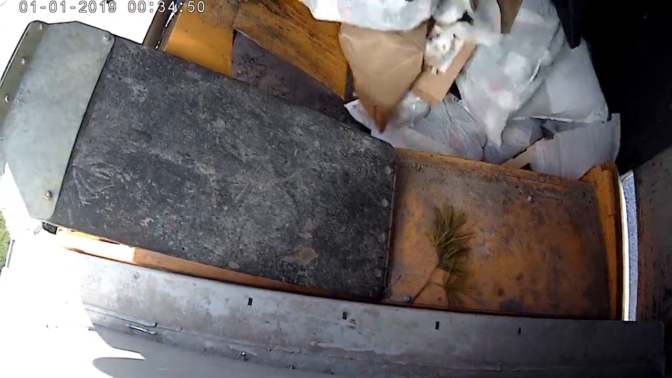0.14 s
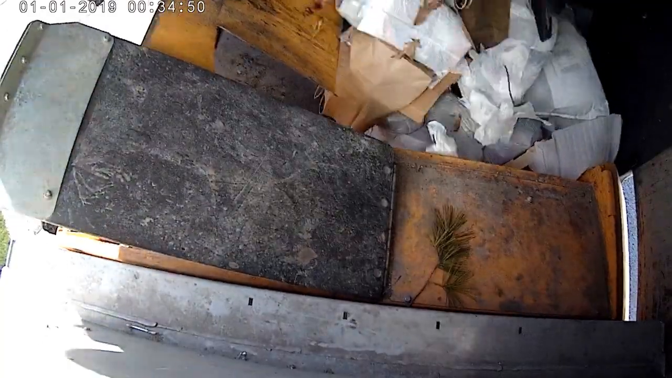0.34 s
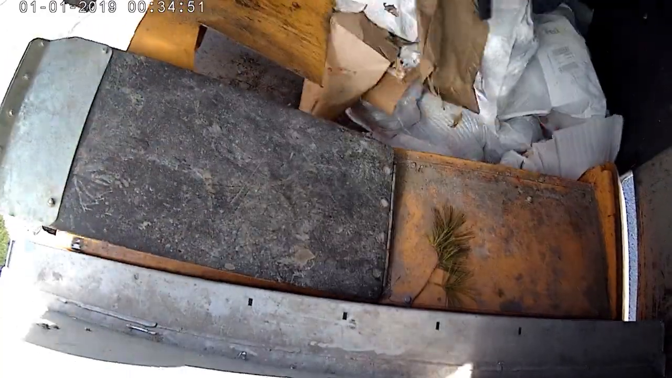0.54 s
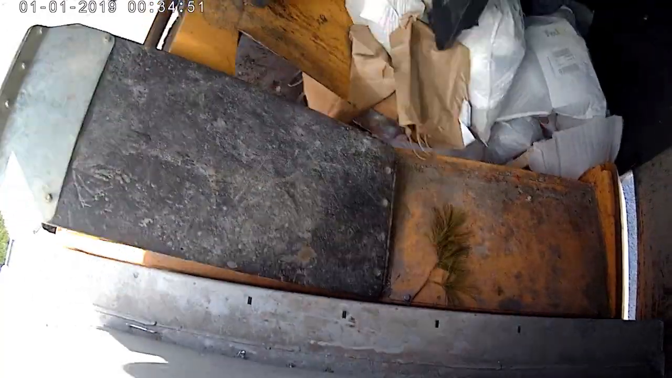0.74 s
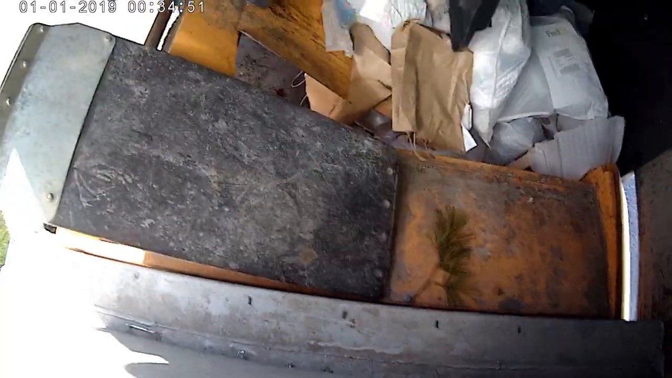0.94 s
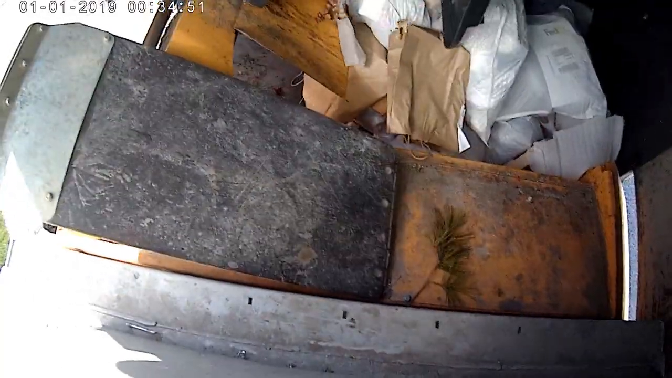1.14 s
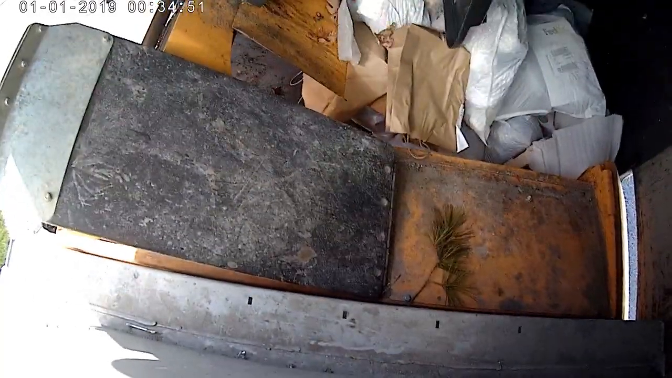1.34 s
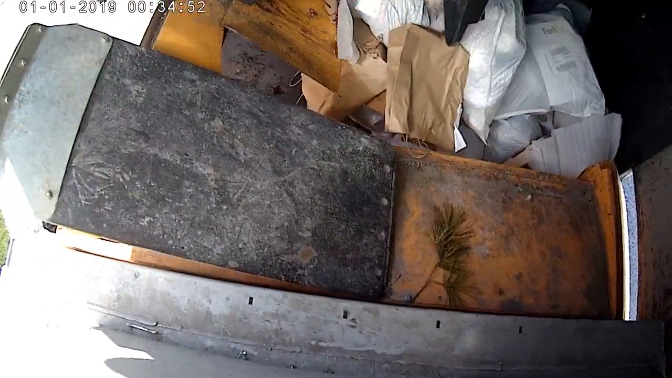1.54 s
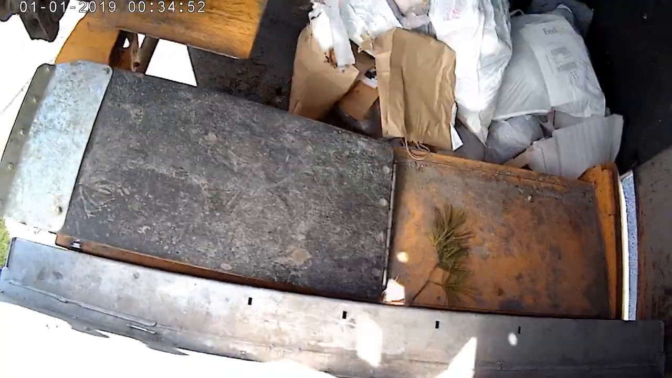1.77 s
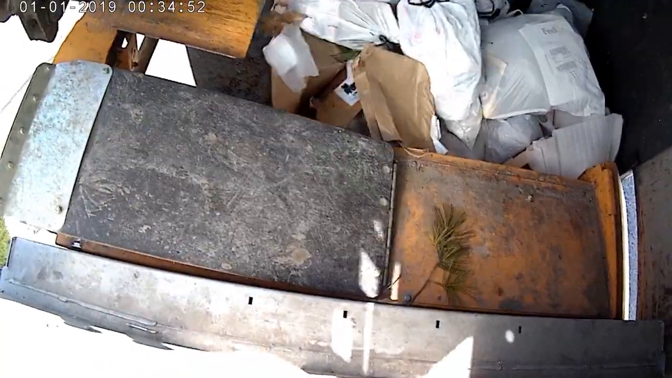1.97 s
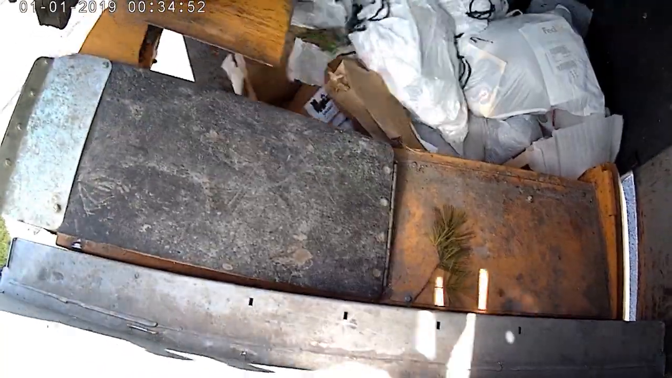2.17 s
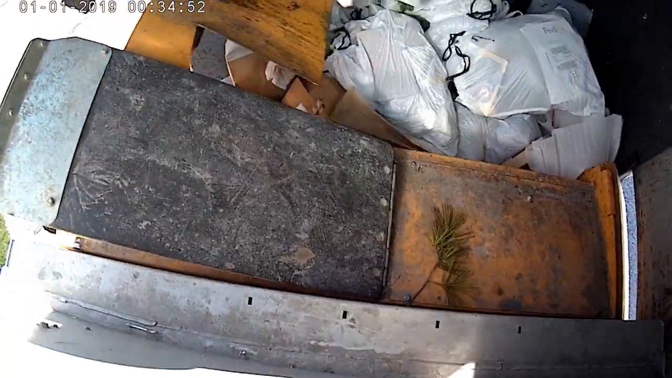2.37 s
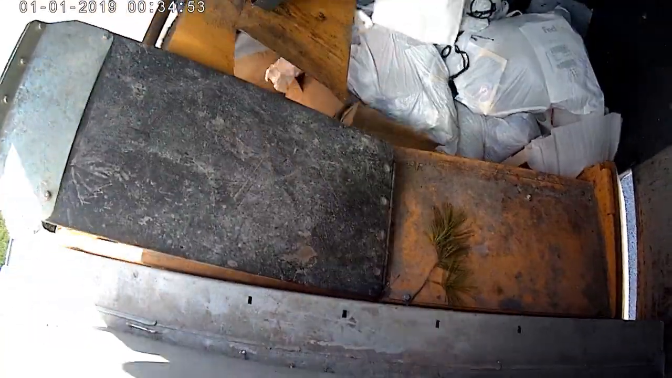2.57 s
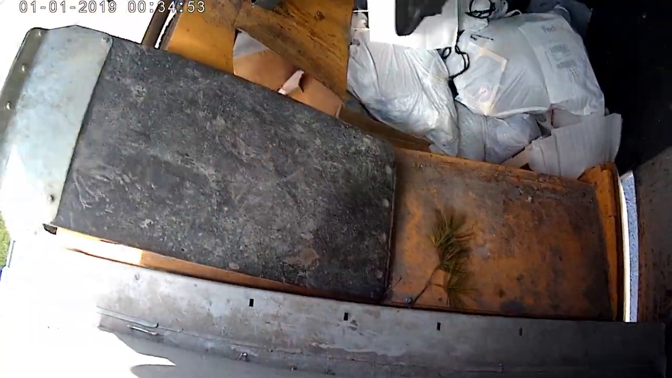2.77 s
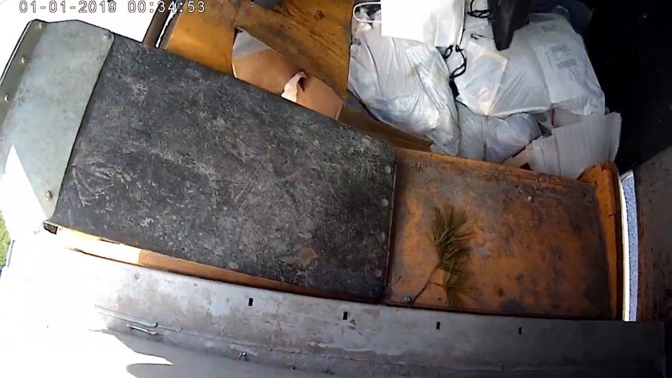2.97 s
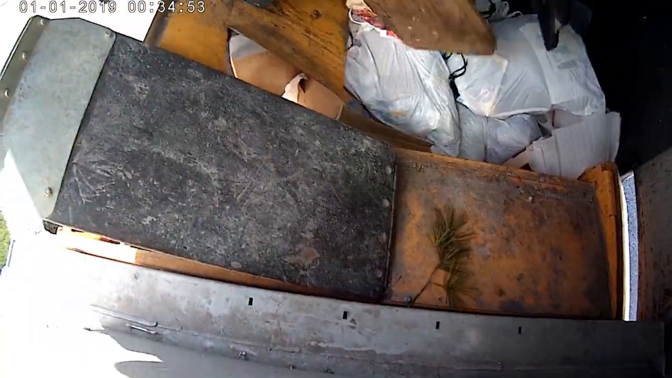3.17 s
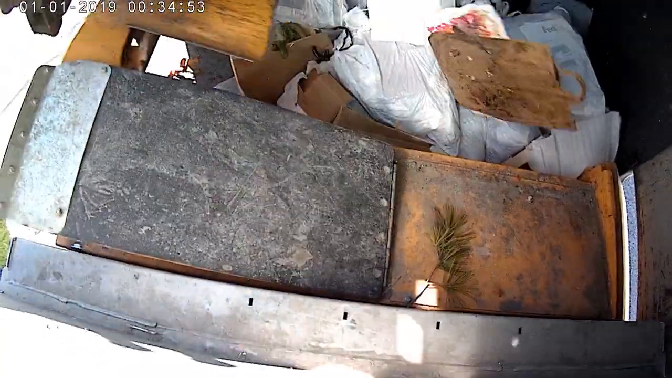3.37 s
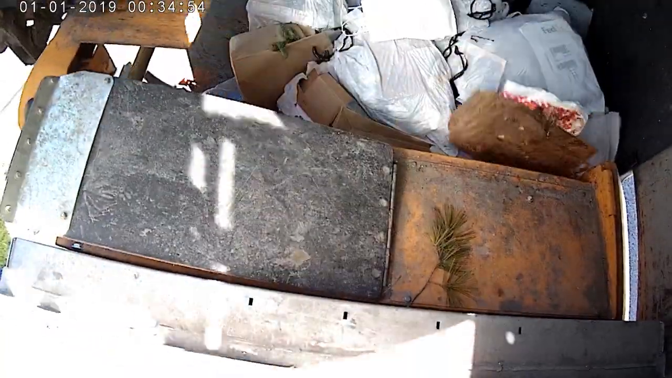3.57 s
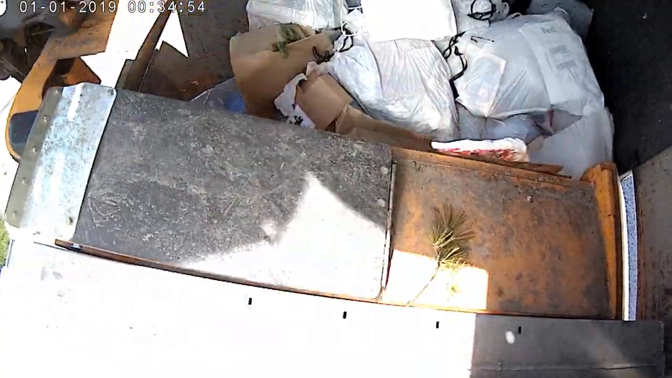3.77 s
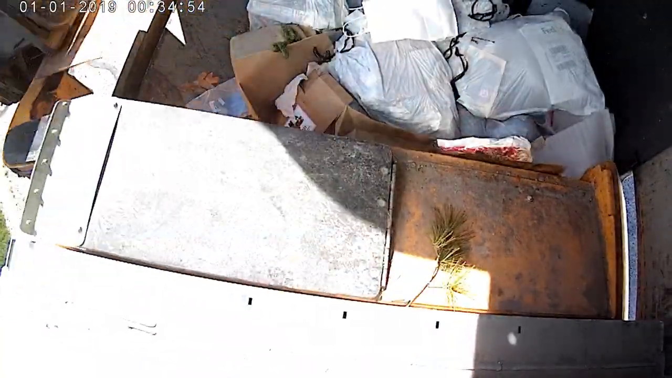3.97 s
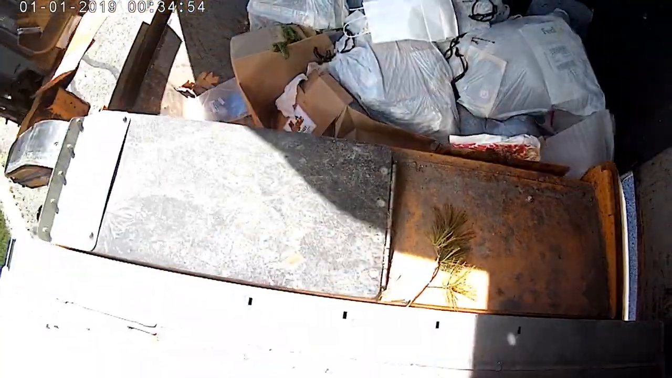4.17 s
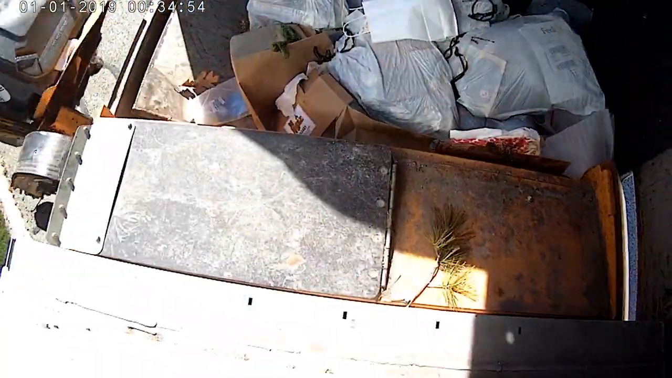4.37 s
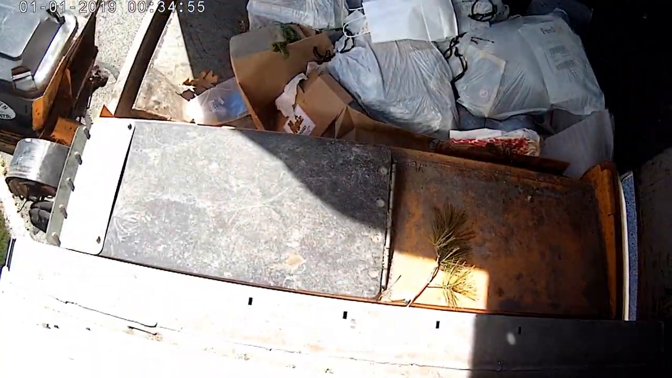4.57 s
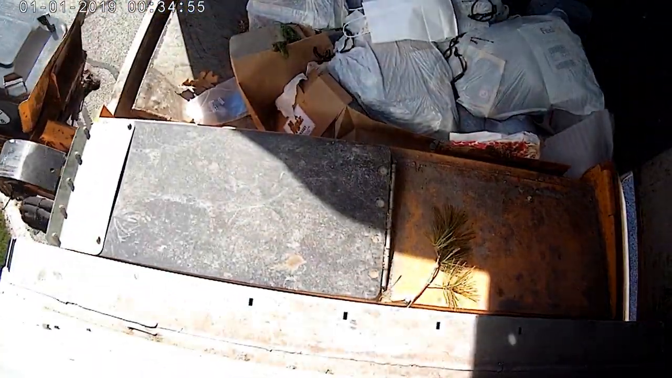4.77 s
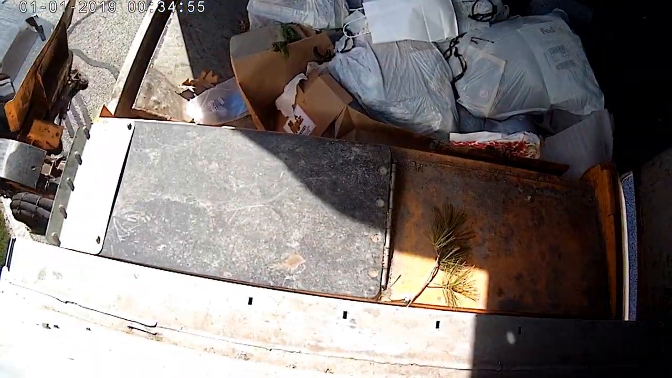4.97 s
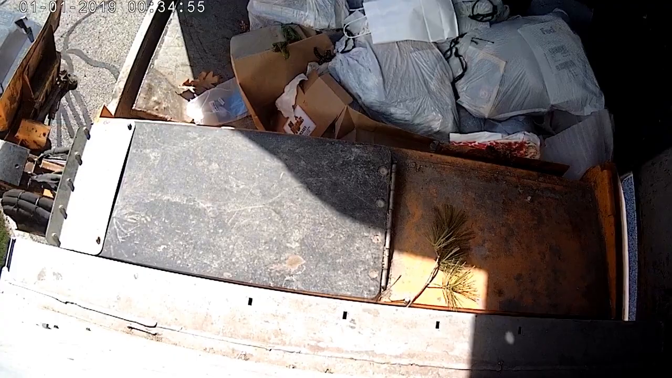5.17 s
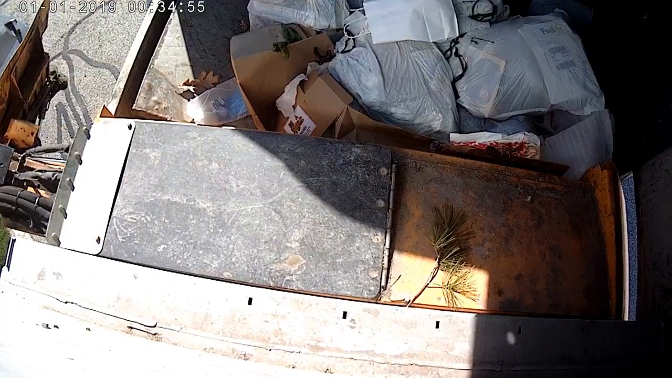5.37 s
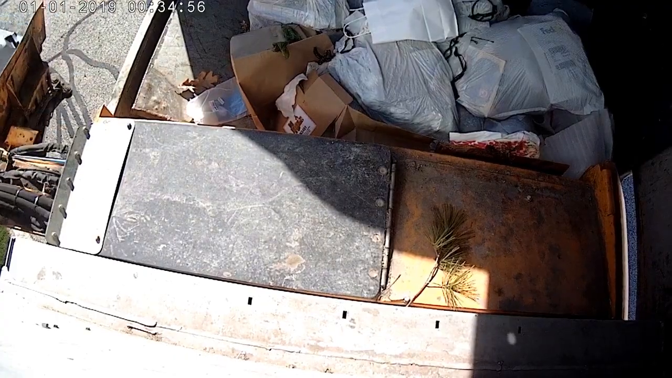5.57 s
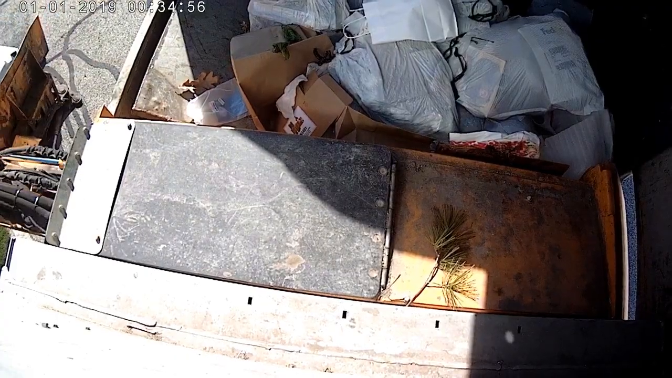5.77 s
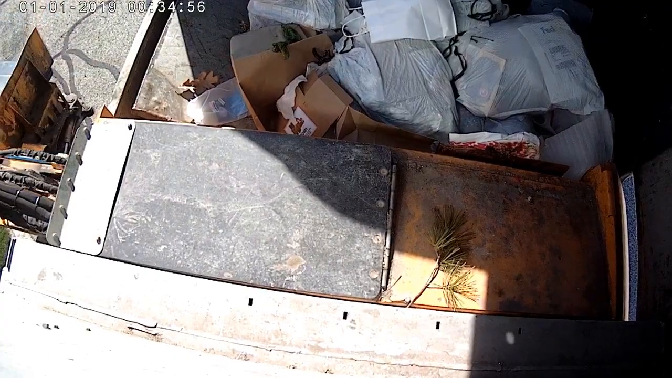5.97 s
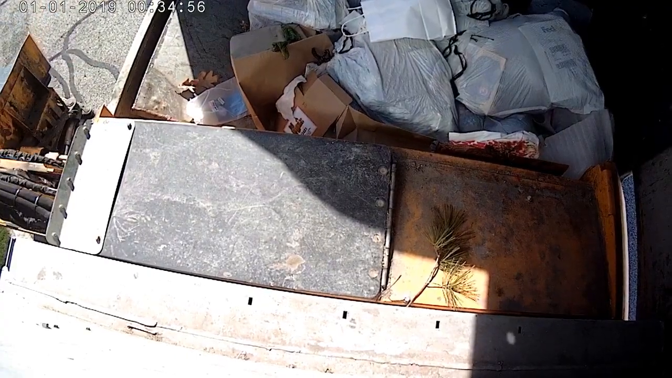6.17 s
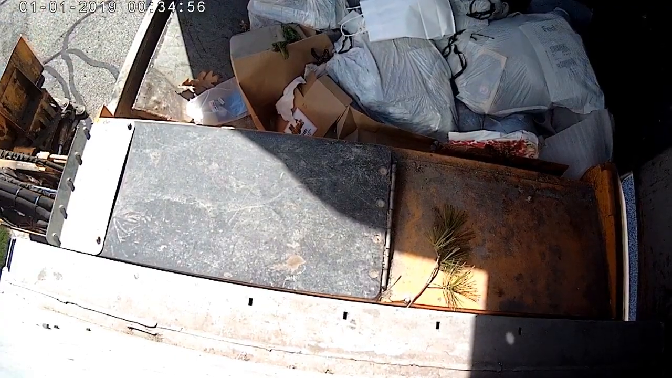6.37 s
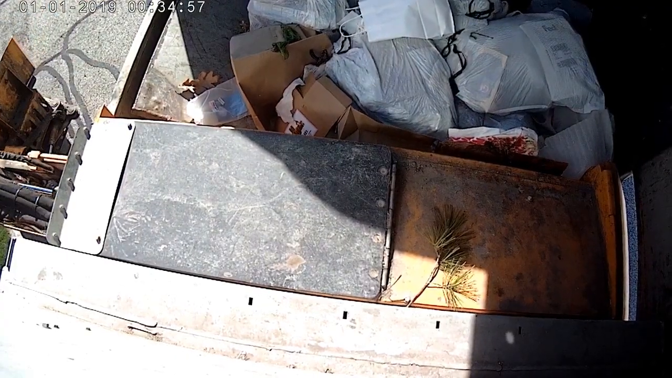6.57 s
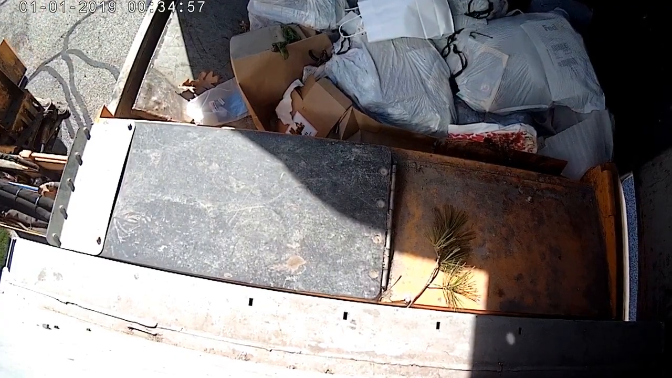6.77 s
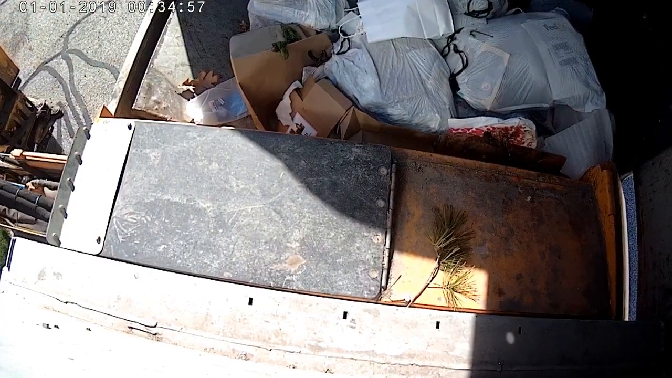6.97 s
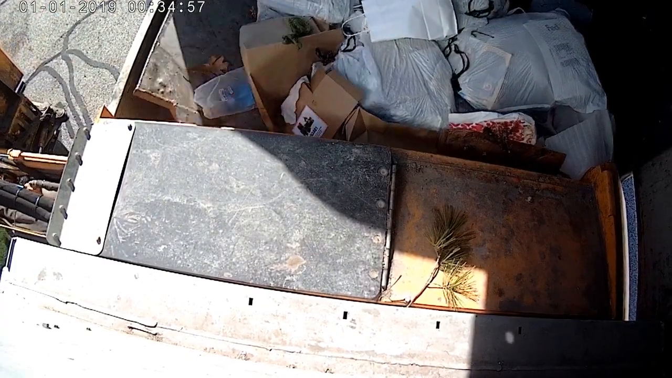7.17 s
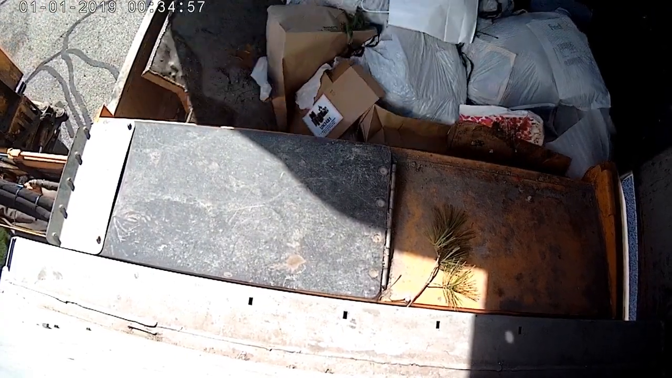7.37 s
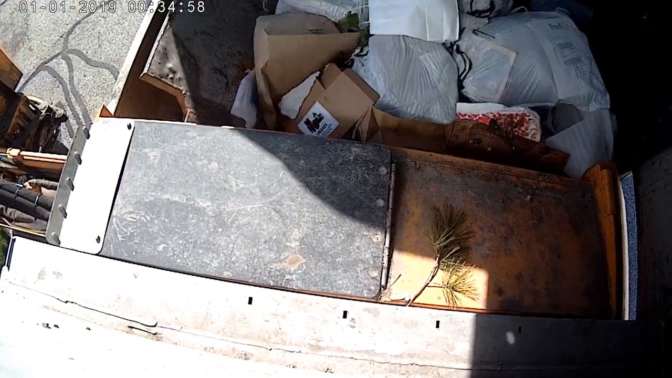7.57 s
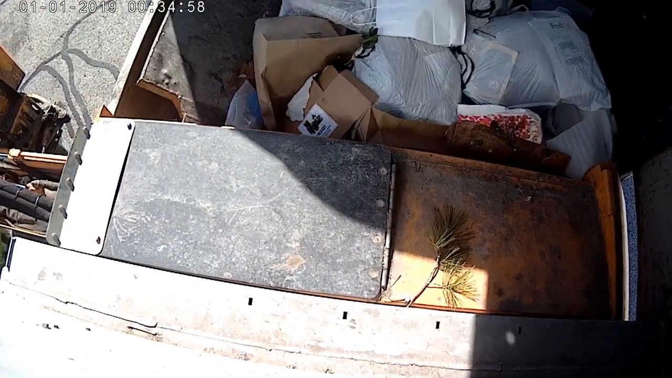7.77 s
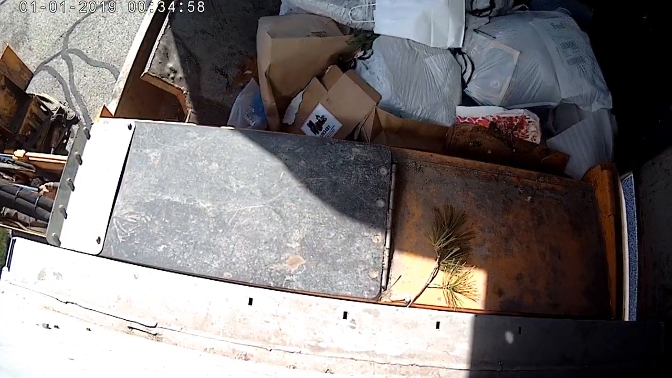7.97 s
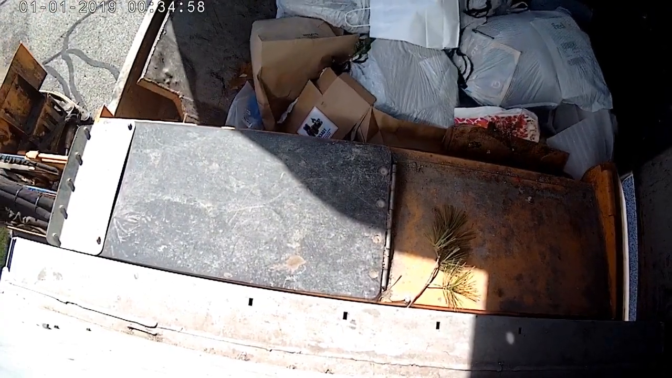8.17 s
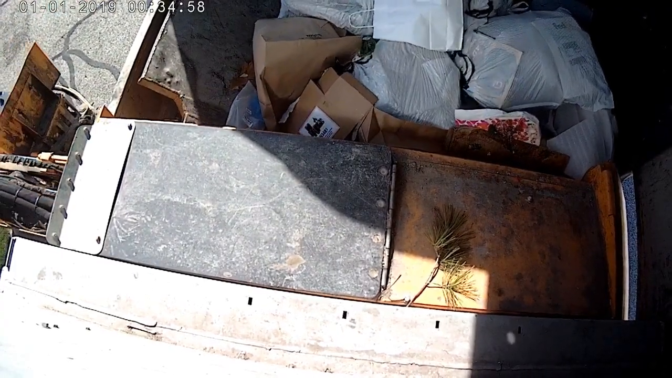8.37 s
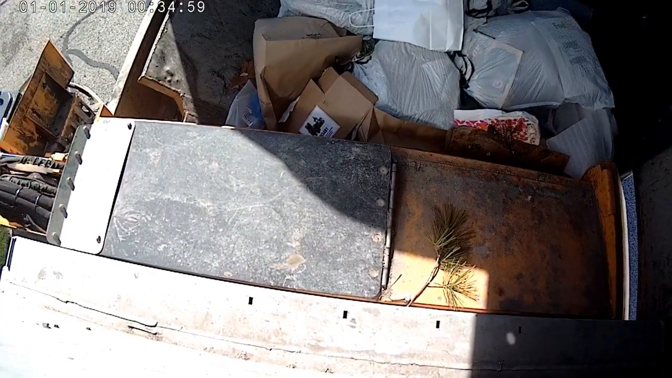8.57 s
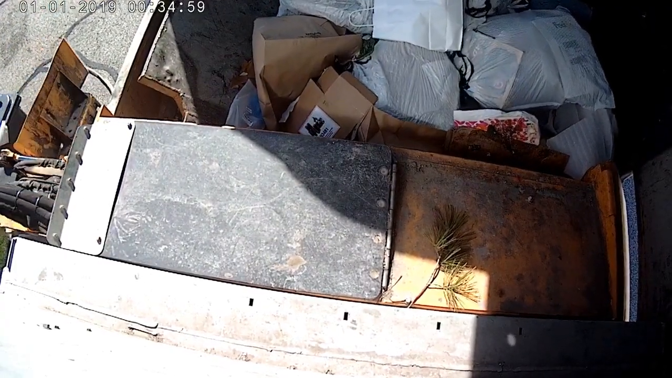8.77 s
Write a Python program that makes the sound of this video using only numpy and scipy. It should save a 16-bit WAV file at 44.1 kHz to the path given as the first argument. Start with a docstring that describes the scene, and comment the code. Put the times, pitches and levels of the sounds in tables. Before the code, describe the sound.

Overdriven metallic bangs, bag crunches and deep booms as a bin is shaken into a refuse truck, then mostly hydraulic whine and engine roar

```python
"""A bin is shaken out into the steel hopper of a refuse truck: blows and a hail of knocks ring steel modes.
Under it the body booms and thumps, as shaped noise and swelling sines, with short pushes of low pressure.
The hydraulic pump whines in steps as its valve moves, over the firing thud and roar of the idling engine.
A small camera fixed to the truck body hears it all far too loud: its narrow-band converter clips,
so booms and blows turn into square-edged buzz."""
import sys
import numpy as np
from scipy import signal
from scipy.fft import rfft, irfft
from scipy.io import wavfile
from scipy.ndimage import uniform_filter1d

SR = 44100
rng = np.random.default_rng(int(sys.argv[2]) if len(sys.argv) > 2 else 0)


def unload_audio(sound):
    """Save the sound as a 16-bit wav file, at the path given as the first command line argument."""
    columns = np.transpose(np.atleast_2d(sound))
    # keep every value between -1 and 1, then stretch to whole-number steps
    steps = np.round(np.clip(columns, -1, 1) * 32767)
    wavfile.write(sys.argv[1], SR, steps.astype(np.int16))


N = 389844


def gain_of(db):
    """Decibels to an amplitude factor."""
    return 10 ** (np.asarray(db) / 20)


def evened(x):
    """Scales to rms 1."""
    return x / np.sqrt(np.mean(x ** 2) + 1e-20)


def curves(rows):
    """Columns of a table as straight lines between its rows, one value a sample."""
    s, *columns = np.transpose(rows)
    return [np.interp(np.arange(N) / SR, s, c) for c in columns]


def held(rows, glide_s):
    """Columns of a table as steps, each gliding to the next."""
    s, *columns = np.transpose(rows)
    row = np.maximum(np.searchsorted(s, np.arange(N) / SR, "right") - 1, 0)
    return [uniform_filter1d(c[row], max(round(glide_s * SR), 1)) for c in columns]


def drift(top_hz):
    """Slow random wander of rms 1, fading out around top_hz."""
    spectrum = rfft(rng.standard_normal(N))
    lowpass = np.exp(-(np.fft.rfftfreq(N, 1 / SR) / top_hz) ** 2)
    return evened(irfft(spectrum * lowpass, N))


def noise(points):
    """Noise of rms 1 with the given spectrum, drawn over log frequency."""
    f, db = np.transpose(points)
    hz = np.fft.rfftfreq(N, 1 / SR)
    shape = np.interp(np.log(hz + 1), np.log(f + 1), db, left=-60, right=-90)
    return evened(irfft(rfft(rng.standard_normal(N)) * gain_of(shape), N))


def ring(x, hz, t60):
    """One mode: a click of height 1 leaves a sine of height 1 that is 60 dB down after t60 seconds."""
    pole = np.exp((2j * np.pi * hz - np.log(1000) / t60) / SR)
    return signal.lfilter([1], [1, -pole], x).imag


def add(mix, s, sound):
    """Lays a sound into the mix at a time in seconds."""
    part = mix[round(s * SR):][:len(sound)]
    part += sound[:len(part)]


# Modes of the steel hopper. Each row: pitch in Hz, relative level in dB, time to fall 60 dB after a blow in s.
HOPPER = [(217.2, 1, 0.15), (303.4, 0.5, 0.076), (409.7, 2, 0.091), (525, -3, 0.05), (626, -3.5, 0.071),
          (680, -5, 0.15), (754, -3, 0.067), (856, -1.5, 0.062), (1030, -2.5, 0.05), (1228, -9, 0.069),
          (1510, -9, 0.016), (2120, -16, 0.032), (2400, -22, 0.056)]
# Single blows on the steel. Each row: start in seconds, strength in dB, note of the struck panel in Hz,
# length of the chatter after it in seconds (at least 5 ms is used).
BLOWS = [(.103, -12, 622, 0.15), (0.176, -5, 530, 0.073), (.267, -11, 750, 0.046), (.337, -8, 813, 0.0066),
         (.41, 1.5, 213, 0.021), (.458, 2, 625, 0.023), (.49, -0.5, 696, 0.03), (.56, -3.5, 666, 0.029),
         (.672, -15, 706, 0.0099), (0.709, -3, 494, 0.042), (.744, 4.5, 562, 0.031),
         (.835, -13.5, 556, 0.033), (0.941, -10, 578, 0.017), (0.989, -9.5, 910, 0.025),
         (1.019, -17, 700, 0.016), (1.084, -17.5, 686, 0.013), (1.145, -14, 662, 0.065),
         (1.262, -18, 692, 0.098), (1.589, -14.5, 412, 0.021), (1.695, -16.5, 680, 0.12),
         (1.878, -27, 870, 0.18), (1.955, -8, 577, 0.073), (2.003, -18, 496, 0.011),
         (2.058, -8, 900, 0.083), (2.173, -10, 761, 0.091), (2.295, -7, 605, 0.048),
         (2.408, -13, 688, 0.037), (2.689, -15, 680, 0.07), (2.788, -13, 550, 0.076),
         (2.928, -3, 1010, 0.074), (2.981, 4.5, 525, 0.072), (3.078, -12, 830, 0.097),
         (3.214, -21.5, 2440, 0.033), (3.259, -12, 1012, 0.01), (3.356, -6.5, 730, 0.029),
         (3.404, -2, 638, 0.018), (3.444, -1.5, 618.5, 0.049), (3.557, -5, 575, 0.052),
         (4.019, -9, 654, 0.066), (4.236, 0, 610, 0.062), (4.289, -3, 614, 0.12), (4.45, -16, 705, 0.042),
         (4.558, -12.5, 691, 0.014), (5.134, -20.5, 893, 0.11), (5.586, -31, 2200, 0.03),
         (5.603, -21, 1250, 0.0076), (5.657, -24.5, 1266, 0.0064), (5.72, -24, 933, 0.11),
         (7.461, -10, 706, 0.06), (7.511, -14, 802, 0.03), (7.538, -17, 910, 0.033),
         (7.851, -18, 1030, 0.049)]
PANEL_CYCLES = 32  # cycles the struck panel rings before it is 60 dB down
NEIGHBOURS_DB = 2.5  # the rest of the hopper against the struck panel


def blows():
    """Each blow is a strike and its chatter, ringing one panel and the hopper modes near its note."""
    out = np.zeros(N)
    t = np.arange(SR // 3) / SR
    for s, blow_db, spot_hz, length in BLOWS:
        # a first strike, then about 1500 weaker knocks a second that hold for a while and stop
        chatter = rng.standard_normal(len(t)) * (rng.random(len(t)) < 1500 / SR) * 0.18
        chatter[0] = 1
        chatter *= np.exp(-(t / max(length, .005)) ** 3)
        near = np.zeros(len(t))
        for hz, db, t60 in HOPPER:
            octaves_away = abs(np.log2(hz / spot_hz))
            near += gain_of(db - 20.0 * octaves_away) * ring(chatter, hz, t60)
        panel = ring(chatter, spot_hz, PANEL_CYCLES / spot_hz)
        clang = panel / abs(panel).max() + gain_of(NEIGHBOURS_DB) * near / abs(near).max()
        crunch = ring(chatter, 2300, .002)
        crunch_db = -14.0 + 0.41 * blow_db  # stronger blows crunch more
        both = clang / abs(clang).max() + gain_of(crunch_db) * crunch / abs(crunch).max()
        add(out, s, gain_of(blow_db) * both)
    return out


# How restless truck and load are between the spills. Each row: time in seconds, boom of the body in dB,
# rattle in the hopper in dB.
UNREST = [(0, -24, -25), (.9, -17.5, -18), (1.1, -21.5, -30), (1.35, -27, -27.5), (1.55, -24.5, -20),
          (1.9, -25.5, -29.5), (2.4, -22, -20), (3.2, -31.5, -29.5), (3.7, -25.5, -22), (3.9, -30.5, -29.5),
          (4.55, -29, -22), (4.68, -27, -30), (5.4, -31.5, -35.5), (6.0, -29.5, -32), (6.4, -31, -44.5),
          (7.0, -33, -36.5), (7.2, -25.5, -25), (7.7, -26.5, -29), (8.84, -30, -30.5)]
# Part of the load slides out and lands. Each row: loudest moment in seconds, boom in dB, rattle in dB,
# crackle of bags in dB, length in seconds.
SPILLS = [(0.029, -31, -15, -34, 0.35), (0.193, -17, -15.5, -32.5, 0.12), (0.323, -18, -22, -33, 0.038),
          (0.446, -9, -17, -36, 0.14), (0.621, -11, -16, -29.5, 0.09), (0.719, -12.5, -15, -27.5, 0.12),
          (0.93, -14.5, -21.5, -35, 0.063), (1.736, -25, -17, -42, 0.14), (1.96, -18.5, -14.5, -37, 0.12),
          (2.094, -17, -11.5, -27.5, 0.12), (2.314, -22, -13.5, -32, 0.047),
          (2.719, -8, -17.5, -34.5, 0.16), (2.787, -18.5, -10.5, -38, 0.15),
          (3.018, -16, -18.5, -28.5, 0.11), (3.119, -28, -17.5, -36.5, 0.064),
          (3.232, -18.5, -19, -34, 0.066), (3.404, -17, -15, -44, 0.19), (4.049, -18.5, -17.5, -42, 0.076),
          (4.305, -17, -12.5, -39, 0.086), (4.477, -16, -24, -44, 0.036), (5.098, -20, -48, -66, 0.17),
          (7.352, -17.5, -25, -48, 0.16), (7.501, -21.5, -15.5, -35, 0.13), (7.783, -20, -25.5, -55, 0.064)]
SPILL_EDGE = 1.38  # larger = more abrupt start and stop
CRACKLE_DB = -26  # crackle of the bags between spills, against the rattle


def shaking(layer):
    """Gain of the boom (0), rattle (1) or crackle (2): the unrest plus every spill, added as powers."""
    boom_db, rattle_db = curves(UNREST)
    unrest_db = (boom_db, rattle_db, rattle_db + CRACKLE_DB)[layer]
    t, power = np.arange(N) / SR, gain_of(2 * unrest_db)
    for s, *db, length in SPILLS:
        near = slice(max(round((s - 2 * length) * SR), 0), round((s + 2 * length) * SR))
        hump = np.exp(-2 * abs((t[near] - s) / (length / 2)) ** SPILL_EDGE)
        power[near] += gain_of(2 * db[layer]) * hump
    return np.sqrt(power)


CLUMP_DB = 2.2  # rms wander of the knocks' size


def falling_load():
    """A hail of small knocks rings the hopper, each at one mode, while bags crunch as they land."""
    size_db = 1.98 * np.minimum(rng.exponential(1, N), 5) + CLUMP_DB * drift(12.8)
    happens = rng.random(N) < 2500 / SR  # about 2500 knocks a second
    knocks = gain_of(size_db) * rng.choice([-1., 1.], N) * happens
    spot = rng.integers(0, len(HOPPER), N)
    rattle = np.zeros(N)
    for k, (hz, db, t60) in enumerate(HOPPER):
        rattle += gain_of(db) * ring(knocks * (spot == k), hz, 0.29 * t60)  # shorter than after a blow
    crinkle = ring(knocks, 2400, .002)
    return evened(rattle) * shaking(layer=1) + evened(crinkle) * shaking(layer=2)


# Spectrum of the truck body booming. Each row: frequency in Hz, relative density in dB per Hz.
BODY = [(20, -9), (45, -2), (65, 1), (100, -2), (140, -4), (200, -20), (300, -22.5), (600, -41)]


def body_boom():
    """Low noise of the body, as loud as the load is restless."""
    return noise(BODY) * shaking(layer=0) * gain_of(2.14 * drift(0.52))


# Low thumps through the chassis. Each row: start in seconds, strength in dB before the swell and decay,
# pitch in Hz.
THUMPS = [(0.298, -18.5, 48.5), (0.522, -9, 62.2), (0.898, -10.5, 56.2), (1.55, -9.5, 100.4),
          (1.95, -6, 49.96), (2.119, -10, 64.2), (2.621, -16, 54.5), (2.798, -16.5, 69.4),
          (3.079, -10.5, 106.2), (5.97, -14.5, 64.54), (7.351, -14.5, 67.27), (7.62, -17, 118.3),
          (7.78, -30, 70.6)]


def thumps():
    """Single low sines that swell in a cycle or more and ring out."""
    out = np.zeros(N)
    t = np.arange(SR // 2) / SR
    for s, db, hz in THUMPS:
        swell = 1 - np.exp(-t / 0.024)
        decay_db = -60 * t / 0.69
        add(out, s, gain_of(db + decay_db) * swell * np.sin(2 * np.pi * hz * t))
    return out


# Short pushes of low pressure. Each row: middle in seconds, direction of the pressure as a sign.
PUSHES = [(.376, 1), (.546, 1), (.82, -1), (.986, 1), (1.056, -1), (1.19, 1), (1.863, -1), (2.262, -1),
          (2.638, 1), (2.686, 1), (3.291, 1), (3.65, 1)]
PUSH_DB, PUSH_S = -11, 0.0084  # height and length of a push


def pressure_pushes():
    """One-sided pushes with rounded edges that drive the converter into clipping and briefly mask the rest."""
    out = np.zeros(N)
    push = signal.windows.tukey(round(PUSH_S * SR), .5)
    for s, direction in PUSHES:
        add(out, s - PUSH_S / 2, direction * gain_of(PUSH_DB) * push)
    return out


# Valve settings of the pump, each held until the next. Each row: start in seconds, pump ripple in Hz,
# its level in dB, overtone near 3/2 in dB (the one near 2 is 10 dB weaker), undertone at 1/2 in dB.
PUMP = [(0, 259.5, -44, -38, -39), (1.1, 263.2, -32.5, -37.5, -36), (1.9, 263.6, -31, -61, -47),
        (3.0, 256.5, -36, -56, -42), (3.5, 247.7, -28, -57, -51), (4.75, 249.8, -27.5, -58, -41),
        (5.05, 254.5, -29.5, -42, -63), (5.33, 247.2, -29, -46.5, -42), (5.7, 268.3, -30, -52, -27.5),
        (5.78, 263.9, -32, -35, -38), (6.15, 263.6, -31.5, -40.5, -37.5), (6.55, 263.4, -32.5, -35, -38),
        (7.14, 259, -30.5, -43, -35), (7.4, 259.8, -35, -39, -34.5), (7.88, 258.9, -33.5, -42, -30.5),
        (8.35, 260, -29.5, -36, -34.5)]
VALVE_S = 0.025  # glide from one setting to the next


def pump():
    """Pressure ripple: the lines sit at or near multiples of half the main whine."""
    hz, main_db, over_db, under_db = held(PUMP, VALVE_S)
    half = np.pi * np.cumsum(hz * (1 + 0.003 * drift(7.8))) / SR  # phase of half the whine, radians
    sway = gain_of(0.29 * drift(18.0))
    main = gain_of(main_db) * np.cos(2 * half)
    overtones = gain_of(over_db) * (np.cos(3.04 * half) + gain_of(-10) * np.cos(4.05 * half))
    undertone = gain_of(under_db) * np.cos(half)
    return np.sqrt(2) * sway * (main + overtones + undertone)


# Level of the firing thud. Each row: time in seconds, level in dB before the order levels and the wander.
FIRING = [(0, -22), (.6, -21.5), (1.2, -30.5), (1.5, -21), (1.7, -28.5), (1.85, -19), (2.2, -24.5),
          (2.7, -19), (3.3, -23.5), (3.9, -24.5), (4.6, -24.5), (5.4, -29), (6.0, -30), (6.4, -38.5),
          (6.9, -39.5), (8.1, -36.5), (8.6, -35), (8.84, -21)]
# Spectrum of the engine and fan roar. Each row: frequency in Hz, relative density in dB per Hz.
ROAR = [(22, -5), (40, -6), (70, -5), (135, 1.5), (230, -1.5), (450, -8), (700, -8.5), (1100, -13),
        (1500, -27), (2000, -33), (2600, -27.5), (2850, -45), (3400, -60), (4000, -60)]
FIRING_HZ, ROAR_DB = 36.61, -31.5  # mean firing rate; roar level before its wander


def engine():
    """The firing thud with a few overtones, over a roar that throbs with it."""
    level_db = curves(FIRING)[0] + 2.2 * drift(9.5)
    turns = np.cumsum(FIRING_HZ * (1 + 0.0502 * drift(5.6))) / SR  # firings so far
    orders = ((1, 2.5), (2, -23.5), (3, -14.5), (4, -12.0))  # (multiple, dB)
    thud = sum(gain_of(db) * np.cos(2 * np.pi * k * turns) for k, db in orders)
    throb = 1 + 0.039 * np.cos(2 * np.pi * turns)
    roar = noise(ROAR) * throb * gain_of(ROAR_DB + 1.0 * drift(6.6))
    return np.sqrt(2) * gain_of(level_db) * thud + roar


def scene():
    """Everything reaches the one microphone on the truck body."""
    load = blows() + falling_load()
    body = body_boom() + thumps() + pressure_pushes()
    return (load + body + pump() + engine())[None]


CONVERTER_HZ = 8000  # sample rate of the camera's converter
SMOOTH_HZ, EDGE_HZ = 3810, 15800  # cutoffs of the smoothing filter and of the final low-pass


def record(dry):
    """Clips in a slow converter; the smoothing filter overshoots and its peaks are squashed once more."""
    slow = signal.resample_poly(dry[0], CONVERTER_HZ, SR)
    full, hardness = 0.1388, 14  # clipping level, sharpness of its corner
    slow = slow / (1 + abs(slow / full) ** hardness) ** (1 / hardness)
    # gritty noise follows how fast the clipped wave swings, averaged over 5 ms
    swing = np.sqrt(uniform_filter1d(np.diff(slow, prepend=0) ** 2, size=40) + 1e-12)
    slow = slow + 0.077 * swing * rng.standard_normal(len(slow))
    # resampling passes through SR * 80, where the smoothing filter works
    smoothing = signal.firwin(441 * 22 + 1, SMOOTH_HZ, window=("kaiser", 9), fs=SR * 80)
    fast = signal.resample_poly(slow, SR, CONVERTER_HZ, window=smoothing)[:N]
    knee, room = .141, .0032  # peaks above the knee are squashed into the room
    over = np.maximum(abs(fast) - knee, 0)
    fast = fast - np.sign(fast) * (over - room * np.tanh(over / room))
    fast = fast * np.minimum(np.arange(N) / (.003 * SR), 1)  # 3 ms fade-in
    edge = signal.firwin(511, EDGE_HZ, window=("kaiser", 9), fs=SR)
    return signal.oaconvolve(fast, edge, "same")[None]


dry = scene()
out = record(dry)
unload_audio(out)
```